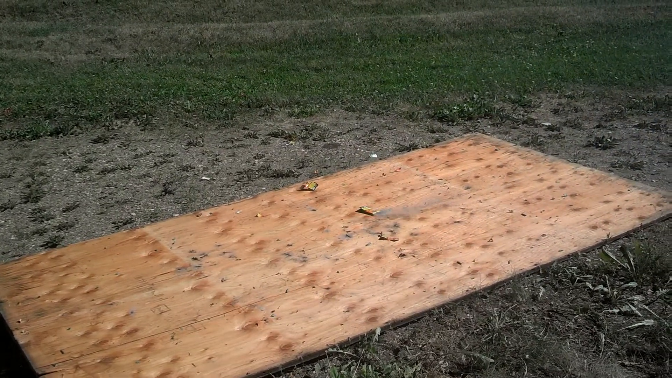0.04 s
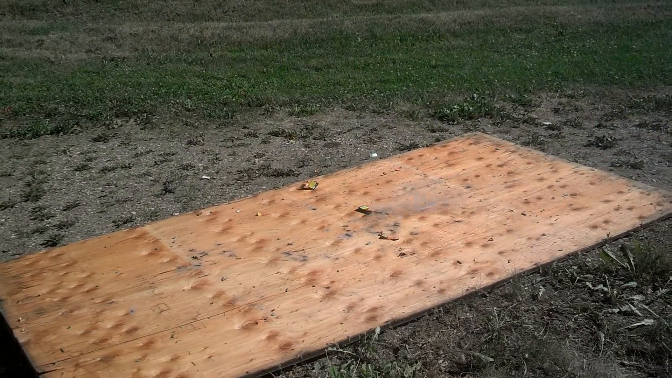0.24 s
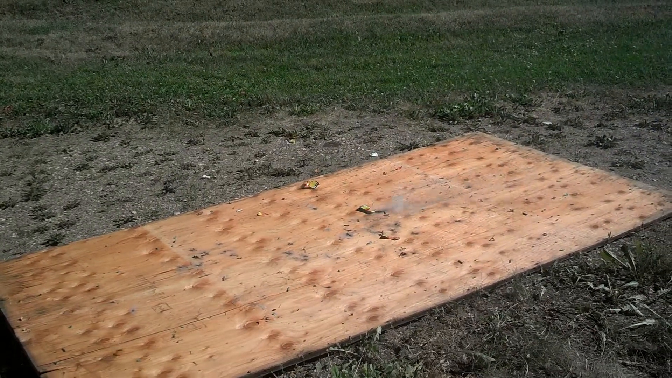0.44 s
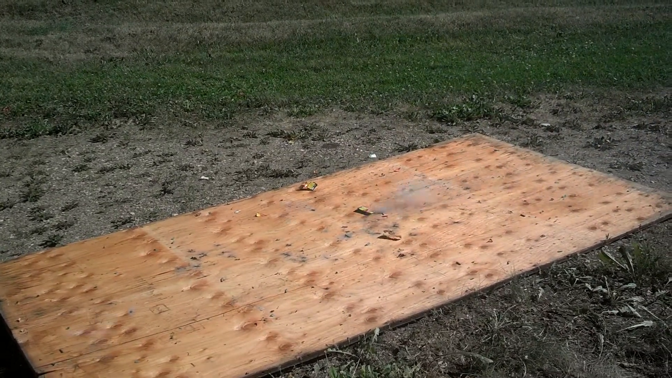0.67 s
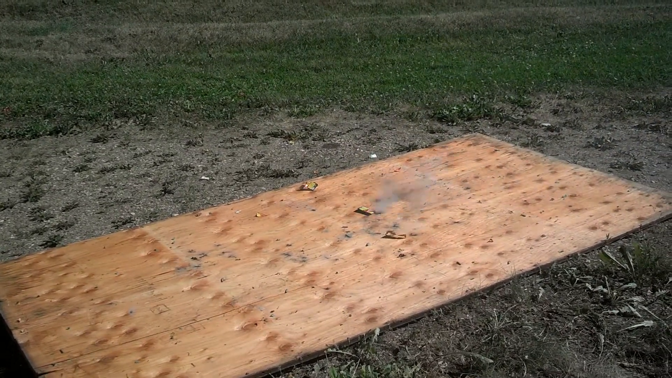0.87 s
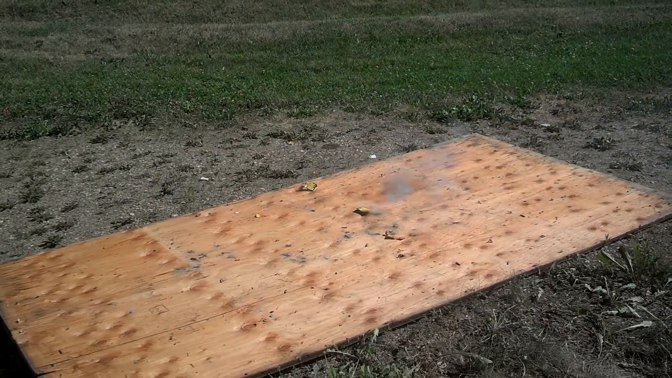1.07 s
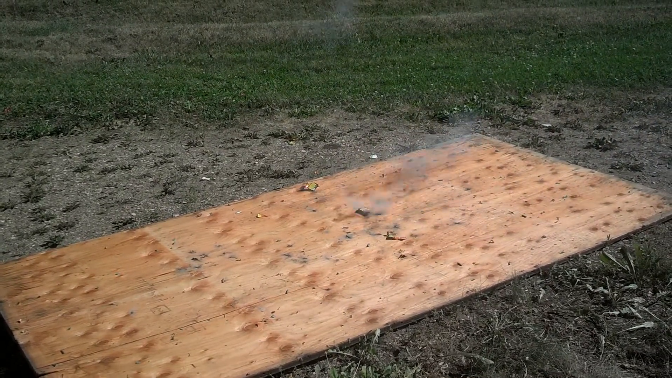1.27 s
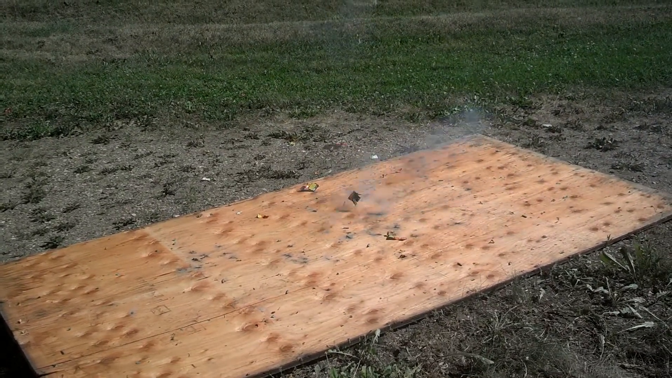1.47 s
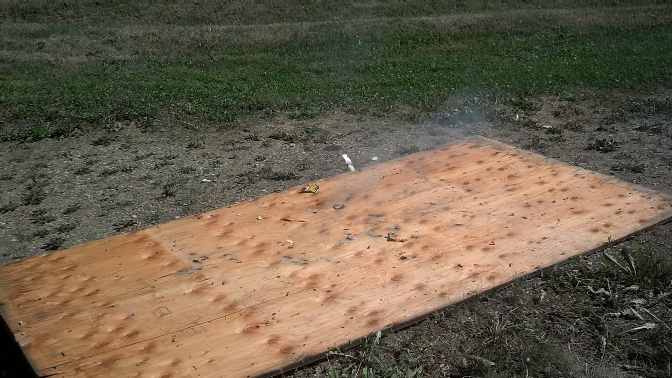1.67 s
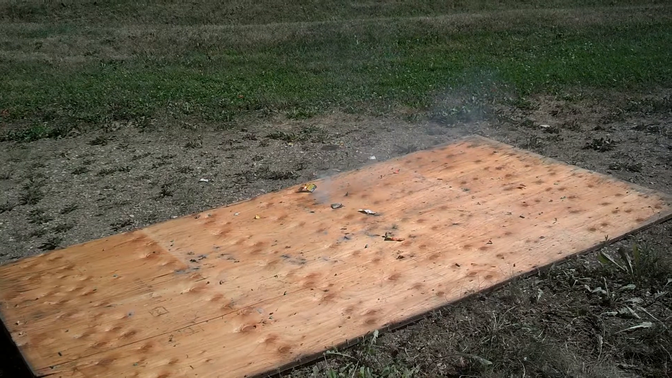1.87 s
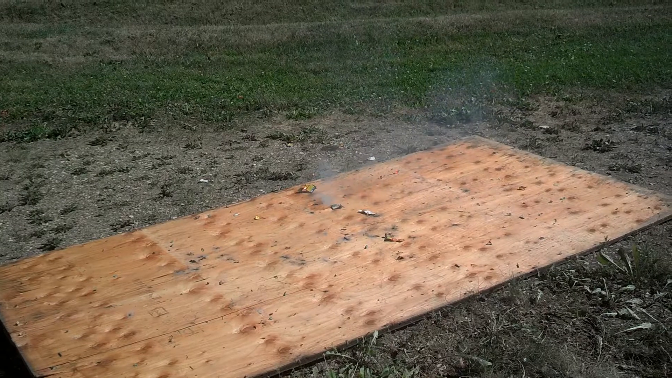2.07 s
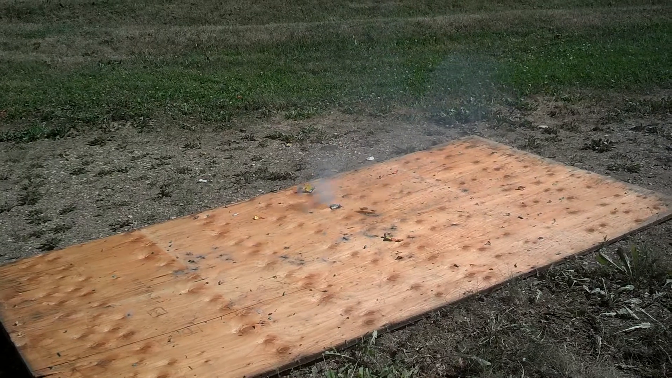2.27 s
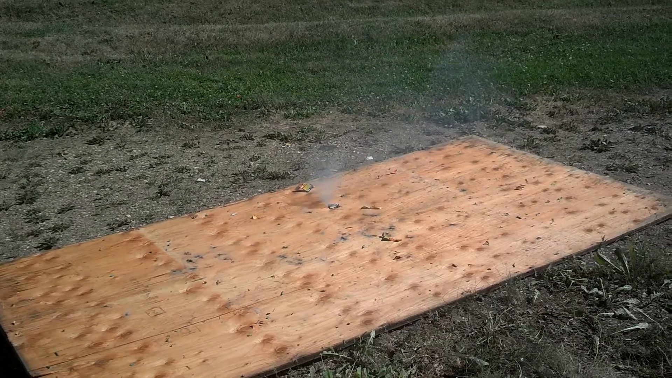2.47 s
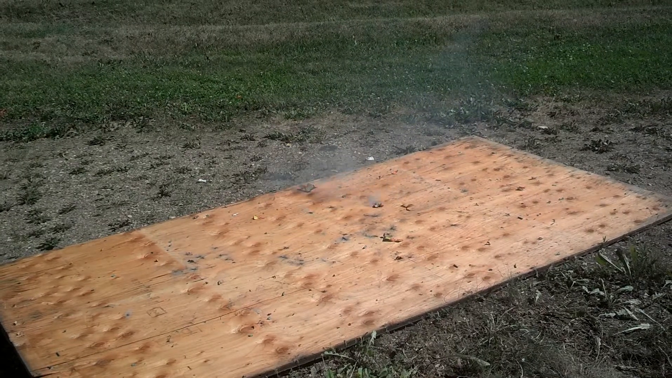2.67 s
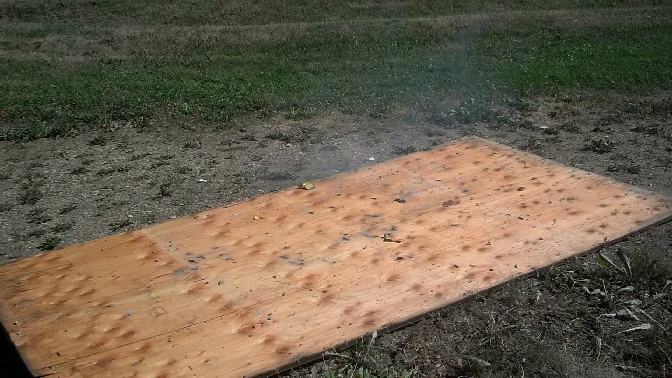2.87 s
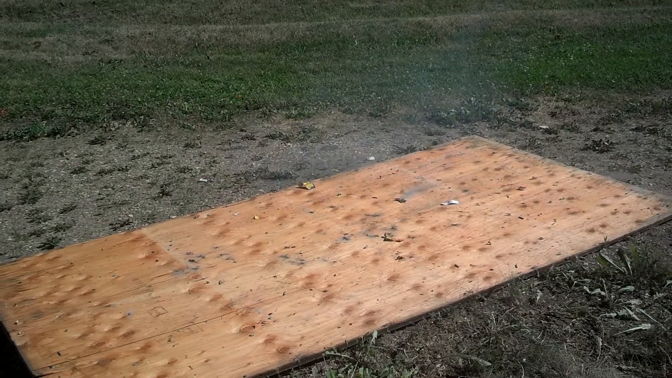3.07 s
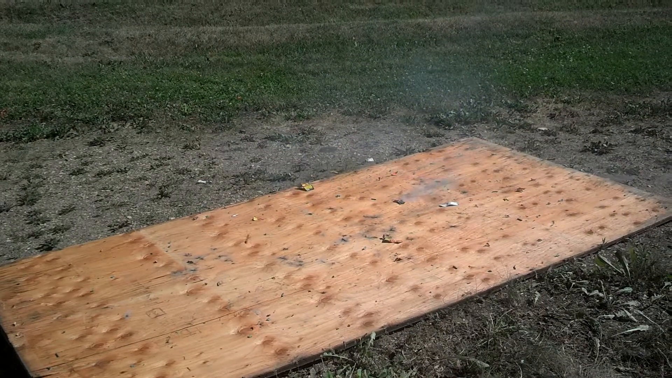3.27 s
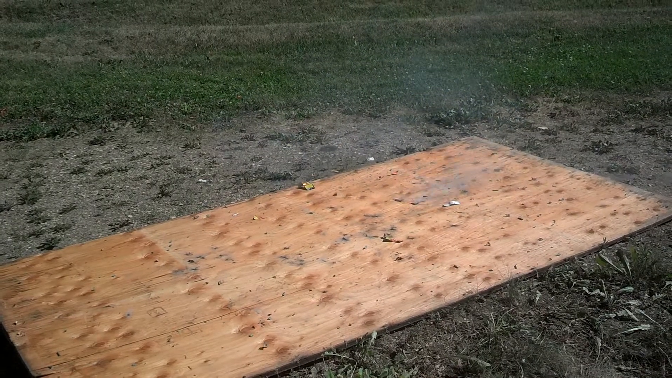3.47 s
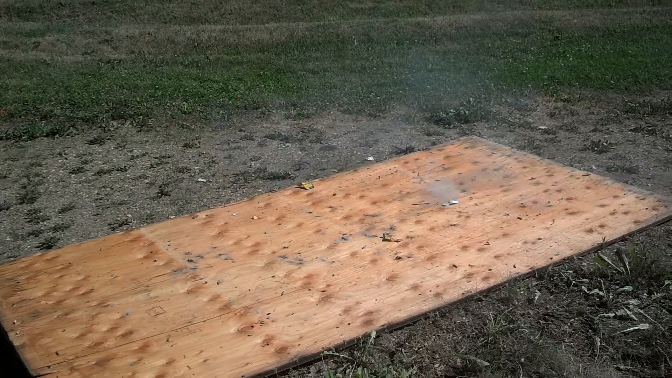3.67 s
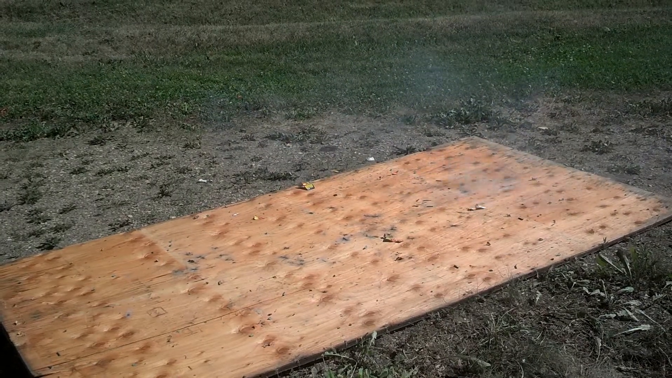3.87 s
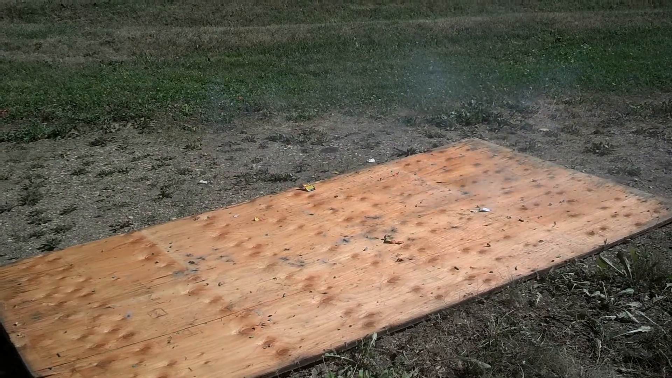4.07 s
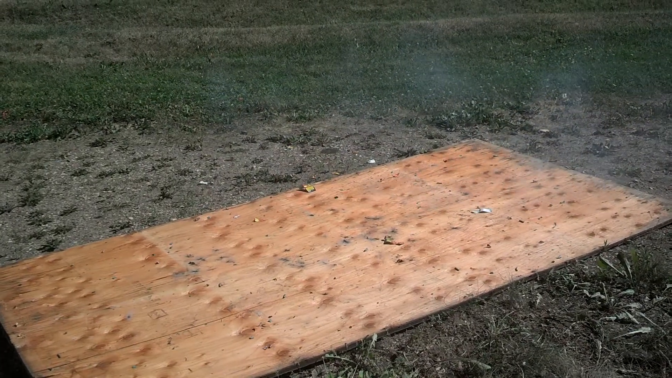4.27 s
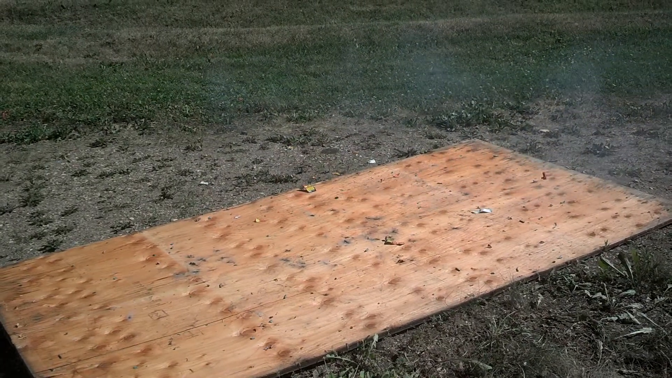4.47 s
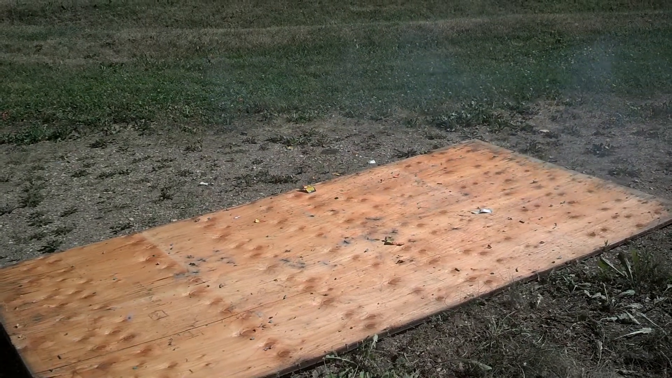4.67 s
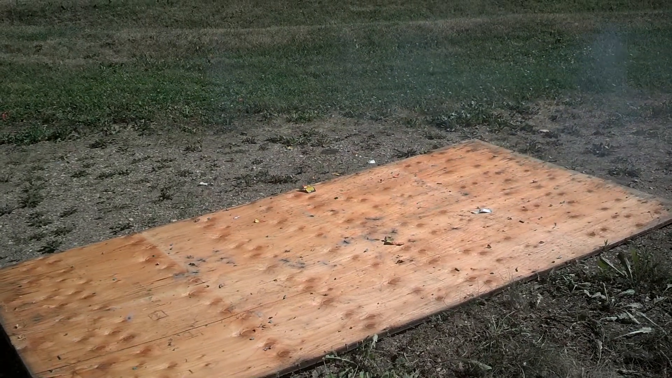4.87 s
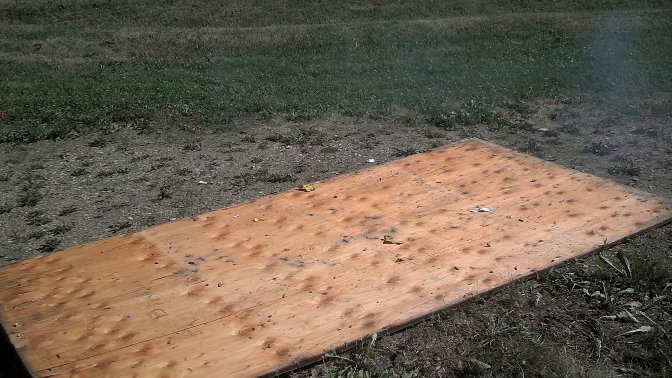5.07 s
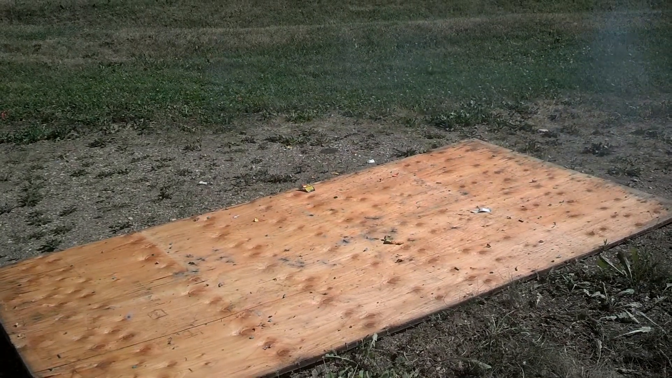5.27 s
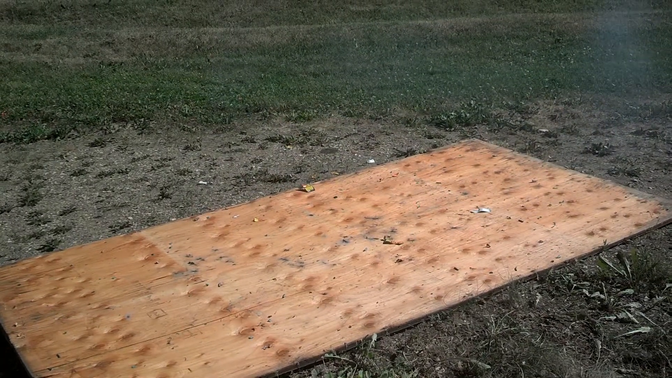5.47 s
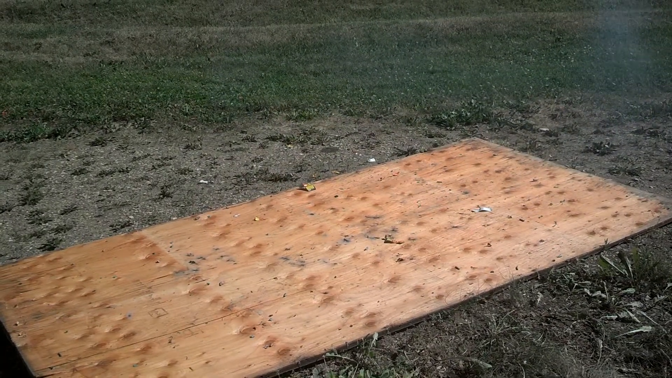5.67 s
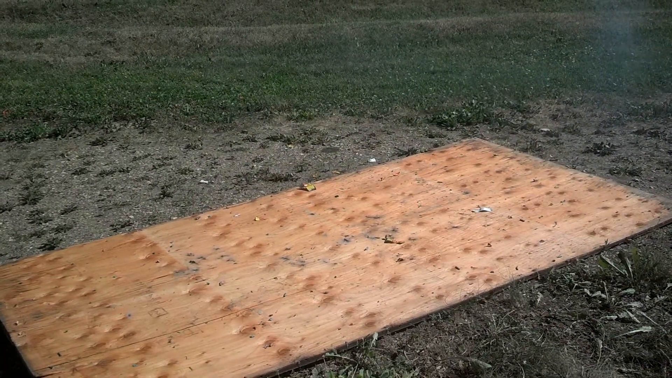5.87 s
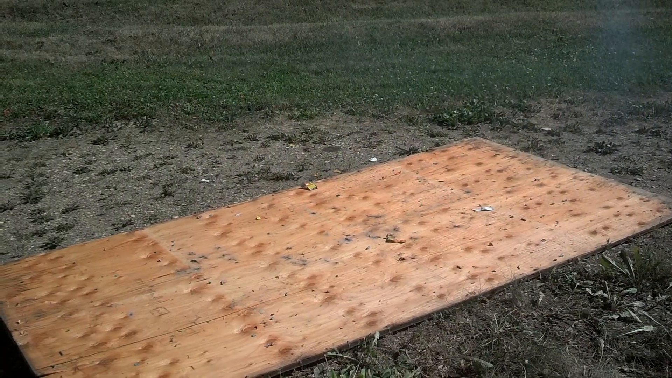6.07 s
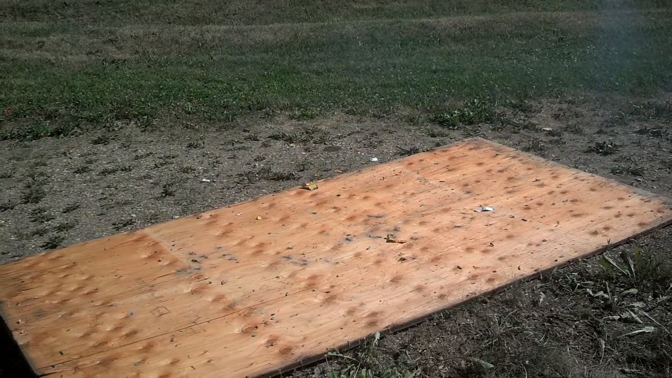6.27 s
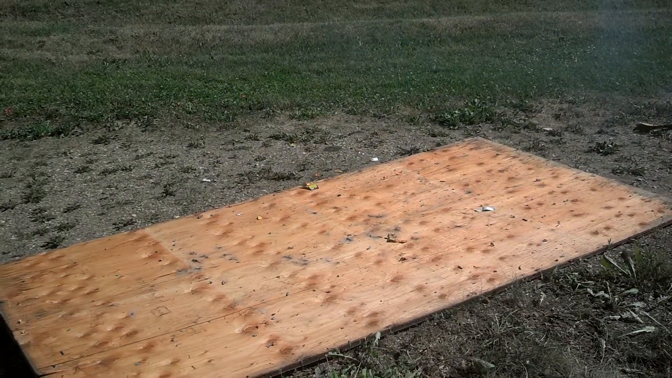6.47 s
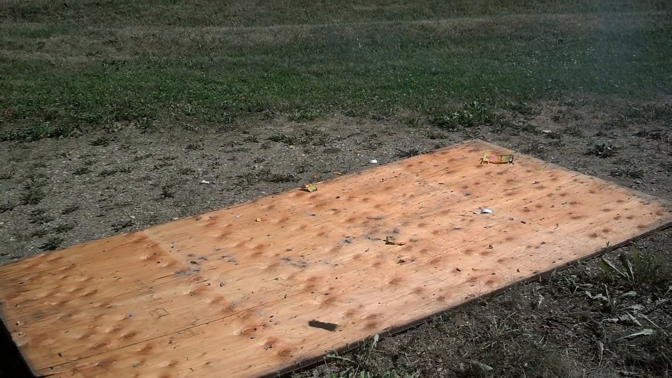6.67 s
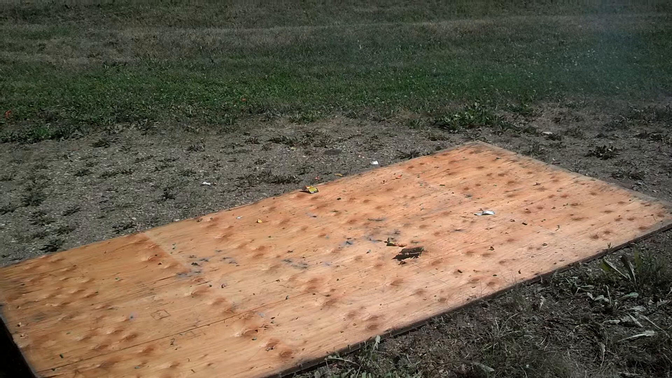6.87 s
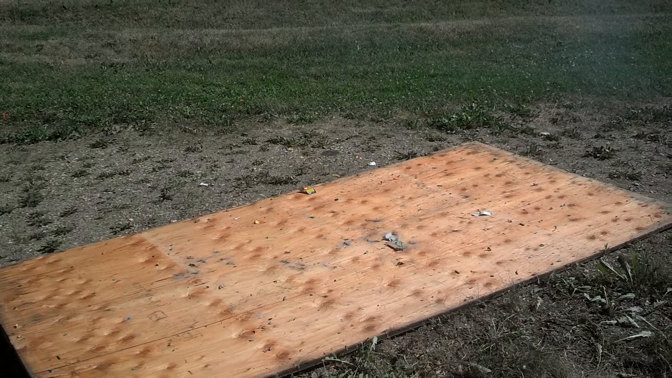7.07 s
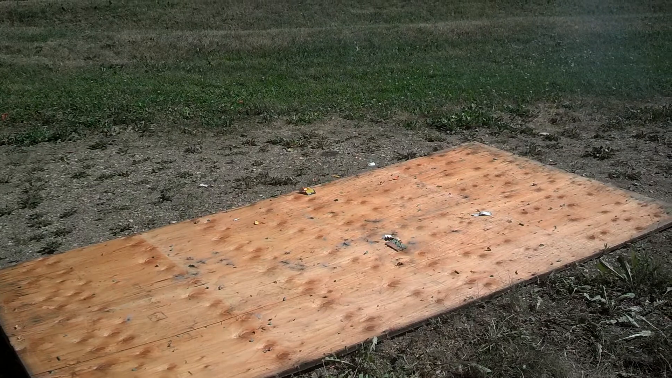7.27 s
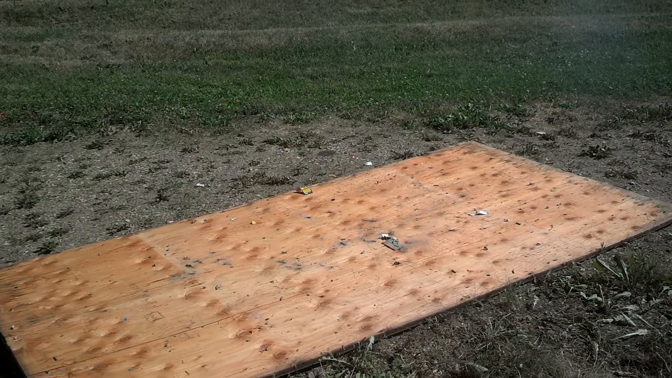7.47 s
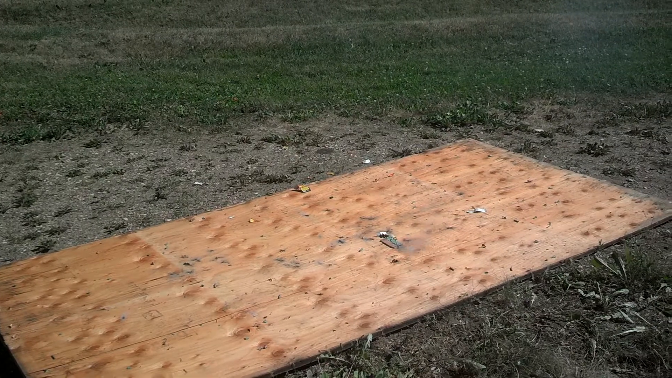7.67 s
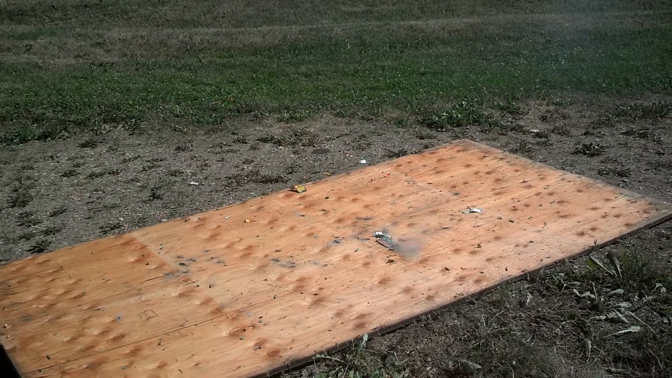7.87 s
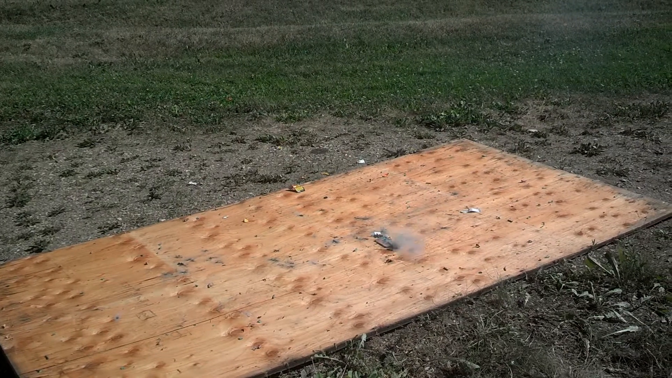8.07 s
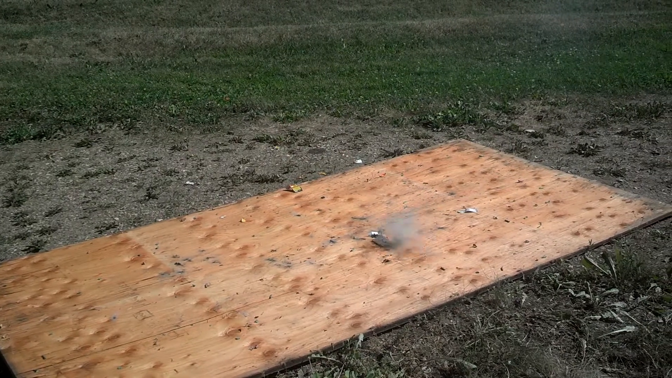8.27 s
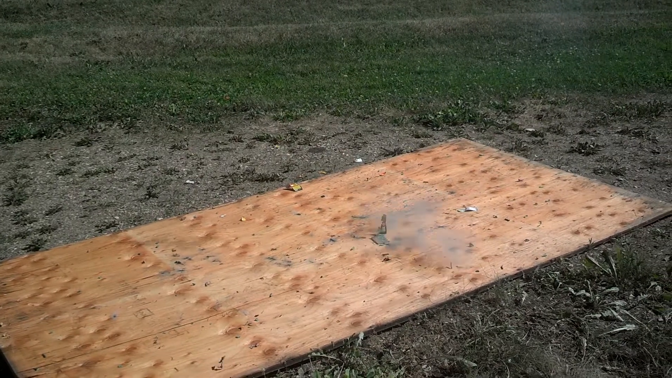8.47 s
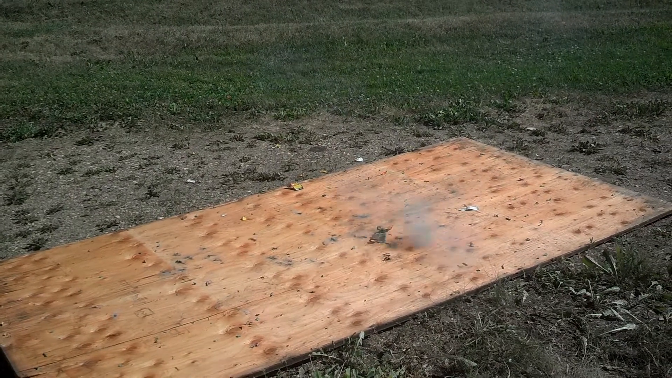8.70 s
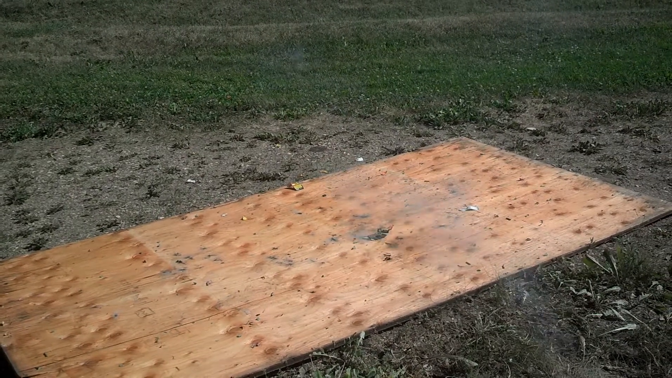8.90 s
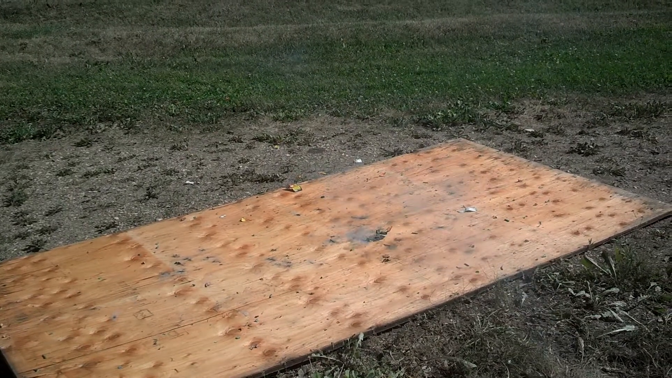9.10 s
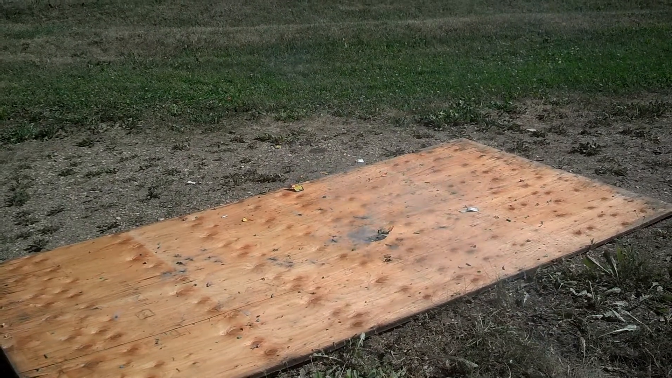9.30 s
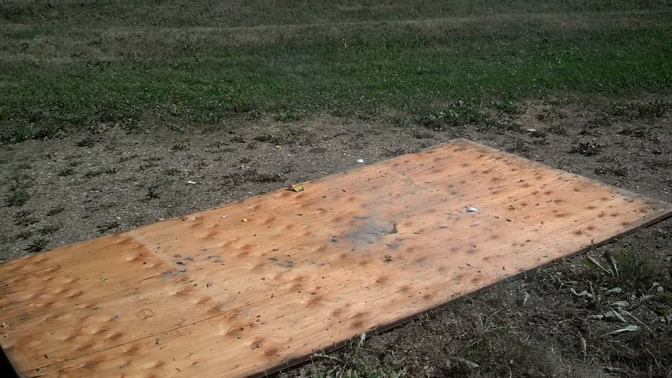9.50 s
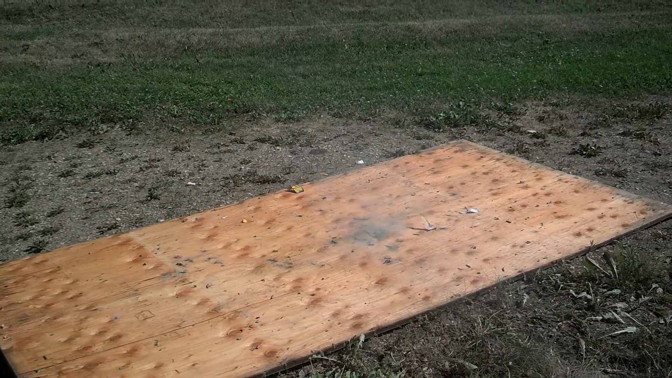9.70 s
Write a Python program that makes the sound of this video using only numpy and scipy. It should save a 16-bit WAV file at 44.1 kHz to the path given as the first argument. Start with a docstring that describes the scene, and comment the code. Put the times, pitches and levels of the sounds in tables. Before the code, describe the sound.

A faint fuse hiss in open air leads at 0.2 s into small firecrackers bursting on plywood. Sharp, dry bangs follow irregularly until 4.2 s, some single, others in tight doubles, varying from bright snaps to duller pops; especially hard hits fall near 3.4 and 3.9 s and may clip. Each has a quick slap from nearby walls and a grainy scattered tail. From 4.2 s the echo dies away and a low field hum gradually returns, with little fuse spits around 5.5 and 6.3 s. At 6.9 s a paper bundle lands with a soft slap. Low wind puffs thump and flutter, mainly on the right, strongest from 7.2 to 7.9 s, over a growing fuse hiss. At 8.3 s a second string cracks rapidly until 8.8 s, then pauses with ringing air and a faint scrap tick; two more bangs come at 9.4 and 9.6 s.

```python
"""Small firecrackers (steps plus gated noise) go off on a plywood sheet in a field; a few walls return the blasts.
Scattered noise bands die away over the ground; a field hum and a hissing fuse share those bands.
In the pause a new bundle drops on the sheet and wind puffs, as swelling sines, rock mainly one of two capsules.
Each channel is one capsule minus the delayed other one, which combs the sound; loud peaks clip."""
import sys
import numpy as np
from scipy import signal
from scipy.io import wavfile
from scipy.ndimage import uniform_filter1d

SR = 44100
rng = np.random.default_rng(int(sys.argv[2]) if len(sys.argv) > 2 else 0)


def digitize_waveform(pressure):
    """Quantize a signal to 16-bit integers and store it at the path in sys.argv[1].

    Rows of a 2-D input are taken as channels; values are limited to [-1, 1].
    """
    field = np.atleast_2d(pressure).T
    bounded = np.clip(field, -1, 1)
    quanta = np.round(bounded * 32767).astype(np.int16)
    wavfile.write(sys.argv[1], SR, quanta)


N = 429534
BURST_SAMPLES = 900


def from_db(db):
    """Decibels to amplitude gain; twice the dB gives power."""
    return 10 ** (np.asarray(db) / 20)


def rms_one(x):
    """Scales to rms 1 along the last axis."""
    return x / np.sqrt(np.mean(x ** 2, axis=-1, keepdims=True) + 1e-20)


def band(x, low_hz, high_hz):
    """Butterworth band-pass."""
    return signal.sosfilt(signal.butter(2, [low_hz, high_hz], "band", fs=SR, output="sos"), x)


def lumps(depth_db, low_hz, high_hz, length=N):
    """Random gain whose dB value wanders at low_hz to high_hz with rms depth_db."""
    return from_db(depth_db * rms_one(band(rng.standard_normal(length), low_hz, high_hz)))


def at_hz(points, hz, axis=1):
    """Reads a table column on a log-frequency axis."""
    points = np.array(points)
    return np.interp(np.log(hz), np.log(points[:, 0]), points[:, axis])


def add(out, x, start_s):
    """Mixes x into out from start_s."""
    i = round(start_s * SR)
    out[..., i:i + x.shape[-1]] += x[..., :N - i]


def pair(shared, own, alike):
    """Two capsule signals: the shared part in phase, the own part in opposite phase."""
    alike = np.clip(alike, -.98, .98)
    return np.sqrt((1 + alike) / 2) * shared + np.sqrt((1 - alike) / 2) * own * [[1], [-1]]


def dying(feed, t60_s):
    """Power envelope that falls 60 dB in t60_s after each feed."""
    return signal.lfilter([1], [1, -from_db(-120 / (t60_s * SR))], feed + 1e-18)


SINK_DB, RECOVER_DB_PER_S, QUIET_BEFORE_S = -21.5, 7.5, 1.4


def background_sink_db():
    """Background level offset: drops at every blast, rises steadily until it reaches 0 dB."""
    t = np.arange(N) / SR
    blast_s = np.r_[-QUIET_BEFORE_S, np.transpose(BANGS)[0]]
    since_s = t - blast_s[np.searchsorted(blast_s, t, side="right") - 1]
    return np.minimum(SINK_DB + RECOVER_DB_PER_S * since_s, 0)


# likeness of distant sound at the capsules: centre_hz, likeness (-1 to 1)
LIKENESS = [(100, 0.56), (400, 0.83), (1000, 0.067), (2500, 0.013)]


def noise_bands():
    """Half-octave bands of distant noise at both capsules, with their centres."""
    edges_hz = 45 * 2 ** np.arange(0, 8.6, .5)
    white = rng.standard_normal((2, 2, N))
    for k, (low_hz, high_hz) in enumerate(zip(edges_hz, edges_hz[1:])):
        centre_hz = np.sqrt(low_hz * high_hz)
        shared, own = band(white[k % 2], low_hz, high_hz)
        yield centre_hz, pair(shared, own, at_hz(LIKENESS, centre_hz))


# field hum spectrum: centre_hz, relative_db (density)
FIELD = [(50, -4), (100, 11), (160, 1.5), (250, 6.5), (400, -0.5), (700, -4.5), (1500, -14.5), (3000, -17),
         (6000, -24), (15000, -32)]


def field_power(hz, field_db):
    """Hum of the field: noise power coloured by its spectrum."""
    return from_db(2 * (field_db + at_hz(FIELD, hz) + 15.5))


# fuse burn before the background sinks: time_s, hiss_db (relative)
BURN = [(0, -51.5), (4.2, -53.5), (4.6, -85), (5.5, -80), (5.6, -66.5), (6.9, -74.5), (7.17, -64),
        (7.3, -55), (8.0, -52.5), (8.3, -48), (9.0, -66.5), (9.74, -38.5)]
# fuse flares: centre_s, boost_db (above the hiss)
FLARES = [(5.52, 15), (6.29, 9), (6.45, 11), (7.04, 9), (7.34, 4), (7.82, 10), (8.16, 2.5)]
FLARE_S = 0.045  # time from centre to 1/e of the boost


def fuse_level_db():
    """Fuse hiss level: interpolated burn plus a short Gaussian swell at each flare."""
    t = np.arange(N) / SR
    burn_s, burn_db = np.transpose(BURN)
    level_db = np.interp(t, burn_s, burn_db)
    for centre_s, boost_db in FLARES:
        level_db = level_db + boost_db * np.exp(-((t - centre_s) / FLARE_S) ** 2)
    return level_db


# fuse hiss spectrum: centre_hz, relative_db (density)
FUSE = [(600, -21), (1500, 2.5), (3400, -3.5), (5500, -5), (9500, -2), (12400, -12.5), (15500, 2)]


def fuse_power(hz, fuse_db, spit):
    """Fuse hiss: noise power above the lowest table frequency, made uneven by spit."""
    if hz <= FUSE[0][0]:
        return 0
    return (spit * from_db(fuse_db + at_hz(FUSE, hz) + 3.5)) ** 2


WAKE_DB, WAKE_T60_S, WAKE_SPREAD_S = -11, 0.33, 0.062
WIND_CUT_HZ, LEFT_WIND_DB = 890, -21


def to_capsules(wind):
    """Dulls the wind and puts it mainly on the right capsule."""
    dull = signal.sosfilt(signal.butter(2, WIND_CUT_HZ, fs=SR, output="sos"), wind)
    return dull * from_db([[LEFT_WIND_DB], [0]])


def wind_rumble(breeze_db):
    """Lumpy low noise: a breeze floor plus a wake that builds round each puff and dies away."""
    feed = np.zeros(N)
    for centre_s, level_db, _ in PUFFS:
        feed[round(centre_s * SR)] = from_db(2 * (level_db + WAKE_DB))
    wake_power = np.abs(uniform_filter1d(dying(feed, WAKE_T60_S), round(WAKE_SPREAD_S * SR)))
    envelope = np.sqrt(wake_power + from_db(2 * breeze_db))
    low_noise = rms_one(band(band(rng.standard_normal(N), 70, 190), 60, 280))
    return to_capsules(envelope * lumps(4, 10, 40) * low_noise)


def blast(thump_db, body_db, crack_db, body_hz, alike, length_ms):
    """A pressure step that swings back, and ragged noise while paper bursts; length_ms scales its decay."""
    t = np.arange(BURST_SAMPLES) / SR
    decay_s = 0.7 * length_ms / 1000
    ragged = lumps(3, 200, 1000, (2, len(t)))
    gate = np.minimum(t / .0007, 1) ** 2 * np.exp(-(t / decay_s) ** 0.99) * ragged
    noise = rng.standard_normal((6, len(t)))

    swing = np.sin(2 * np.pi * 330 * t / (1 + t / .008)) * np.exp(-t / .003)  # slows as it fades
    wobble = band(noise[0] * np.exp(-t / .004), 100, 480)
    thump = pair(rms_one(band(swing, 47, 730)), rms_one(wobble), alike)

    # lower body partly shared by the capsules, upper body independent
    low_body = band((1.5 * noise[1] + noise[2:4]) * gate, body_hz / 2.8, body_hz)
    high_body = band(noise[2:4] * gate, body_hz, body_hz * 2.26)
    body = rms_one(0.86 * low_body + high_body)

    low_crack = band(noise[4:] * gate, 2200, 6000)
    high_crack = band(noise[4:] * gate, 7500, 17000)
    crack = rms_one(low_crack + from_db(-7) * high_crack)

    bright = from_db(body_db) * body + from_db(crack_db) * crack
    direct = (from_db(thump_db) * thump + bright) / np.sqrt(2)
    return direct, bright


# firecracker blasts, plus two strong wall returns (at 0.621 s and 0.7971 s) played like blasts: start_s,
# thump_db, body_db, crack_db, body_hz, tail_db (levels relative)
BANGS = [(0.1998, -19, -16.5, -17.5, 1080, -37.5), (0.6046, -21, -21, -21, 1090, -40),
         (0.621, -41.5, -34, -31.5, 1060, -45), (0.7789, -19, -17, -23, 860, -38),
         (0.7971, -11.5, -19.5, -21.5, 720, -41), (1.0438, -21, -20, -20.5, 1440, -38),
         (1.1044, -19.5, -17.5, -20.5, 1310, -33.5), (1.152, -20, -20, -22, 1160, -34.5),
         (1.1724, -16, -22.5, -20.5, 1260, -39.5), (1.326, -17.5, -19.5, -21.5, 786, -39),
         (1.4498, -16, -16, -19, 1020, -38.5), (1.5455, -23, -21.5, -22.5, 1270, -40.5),
         (1.7273, -23, -8, -26.5, 647, -42), (1.8952, -21, -18.5, -26, 750, -43),
         (2.1532, -25, -15, -21, 755, -40), (2.2907, -24, -19, -21, 856, -35),
         (2.5821, -24.5, -16, -21, 844, -37), (2.609, -24.5, -19, -40, 1020, -44),
         (2.6925, -35, -28.5, -32, 890, -53.5), (2.7321, -19.5, -22, -23, 950, -39.5),
         (2.7416, -18.5, -22, -26, 960, -41.5), (3.077, -23.5, -16, -25, 650, -43.5),
         (3.1576, -30.5, -22.5, -28, 1050, -43), (3.322, -20, -18.5, -28, 745, -45.5),
         (3.428, -3, -17.5, -28.5, 734, -48), (3.554, -31, -23.5, -34.5, 1170, -56.5),
         (3.599, -14.5, -19, -22, 1130, -40.5), (3.6534, -10.5, -16.5, -31.5, 650, -39),
         (3.6655, -22, -14, -20.5, 970, -37.5), (3.922, -24, -20, -32, 720, -42.5),
         (3.9328, -9.5, -9, -15.5, 615, -43), (3.9496, -21.5, -23, -32, 656, -49.5),
         (4.0221, -19, -17, -23, 930, -37), (4.208, -21.5, -20.5, -24.5, 645, -40),
         (8.3156, -16, -11, -15, 1343, -44.5), (8.3774, -20, -17.5, -22, 820, -33),
         (8.3933, -23, -18.5, -24, 785, -42.5), (8.453, -14, -17, -29.5, 740, -45.5),
         (8.5139, -20.5, -18, -23.5, 1040, -36), (8.5427, -20, -15, -39.5, 606, -43.5),
         (8.7326, -16.5, -18.5, -20.5, 1140, -34.5), (8.7767, -14.5, -21, -19.5, 795, -45.5),
         (8.7831, -24, -19, -29.5, 900, -41), (9.4138, -14, -17, -25, 1220, -40.5),
         (9.582, -15.5, -20, -20.5, 1300, -43.5)]
THUMP_ALIKE, ALIKE_SPREAD = -.1, 0.66
BURST_SCALE_MS, BURST_DOUBLES_DB, USUAL_TAIL_DB = 4.4, 16, -22


def bangs():
    """Firecracker blasts with wall returns; more tail for its body means a longer burst."""
    out = np.zeros((2, N))
    sides = rng.standard_normal(len(BANGS))
    for (start_s, thump_db, body_db, crack_db, body_hz, tail_db), side in zip(BANGS, sides):
        excess_db = tail_db - body_db - USUAL_TAIL_DB
        length_ms = BURST_SCALE_MS * 2 ** (excess_db / BURST_DOUBLES_DB)
        alike = THUMP_ALIKE + ALIKE_SPREAD * side
        direct, bright = blast(thump_db, body_db, crack_db, body_hz, alike, length_ms)
        add(out, direct, start_s - .0006)
        add_wall_returns(out, bright, start_s, tail_db)
    return out


# wall returns: delay_s, relative_db (above the tail level)
ECHOES = [(.0140, -1), (.0175, -4), (.0300, -3.5), (.0380, -6), (.0665, -3)]


def add_wall_returns(out, bright, start_s, tail_db):
    """Walls return a shortened, band-limited burst at fixed delays with slightly random levels."""
    t = np.arange(BURST_SAMPLES) / SR
    snap = rms_one(band(bright * np.exp(-t / .002), 450, 12000))
    for delay_s, relative_db in ECHOES:
        add(out, from_db(tail_db + relative_db + rng.normal(0, 1.5)) * snap, start_s + delay_s)


def tail_feed(hz):
    """Power that each blast scatters near hz: a dull blast leaves a dull tail."""
    start_s, _, body_db, crack_db, _, tail_db = np.transpose(BANGS)
    tilt_db = 0.071 * (crack_db - body_db + 13.0) * np.log2(hz / 1500)
    feed = np.zeros(N)
    feed[np.round((start_s + .011) * SR).astype(int)] = from_db(2 * (tail_db + tilt_db))
    return uniform_filter1d(feed, size=300) * 300


# scattered returns: centre_hz, relative_db (density), near_t60_s, far_t60_s
TAIL = [(100, 2.5, 0.2, 0.18), (302, 4, 0.23, 0.81), (804, -5.5, 0.38, 1.3), (1450, -8.5, .5, 1.9),
        (2350, -10, 0.6, 2.1), (4400, -17.5, 0.64, 1), (9340, -22, 0.4, 1.3), (15800, -20.5, 0.19, 0.42)]
FAR_DB = -17


def scattered_power(hz, grain):
    """Scattered returns: clumpy near decay plus a smooth, weaker far decay."""
    feed = tail_feed(hz)
    patchy = lumps(2.1, 16, 60)  # each band has clumps of its own
    near = dying(feed, at_hz(TAIL, hz, axis=2)) * (grain * patchy) ** 2
    far = dying(feed, at_hz(TAIL, hz, axis=3)) * from_db(2 * FAR_DB)
    return (near + far) * from_db(2 * (at_hz(TAIL, hz) - 5))


def open_air(field_db, fuse_db):
    """Field hum, fuse hiss and scattered returns sum as power in one bank of noise bands."""
    spit = lumps(1.5, 8, 60)  # the fuse burns unevenly
    grain = lumps(2.6, 40, 250)  # returns arrive in clumps
    out = 0
    for hz, noise in noise_bands():
        power = scattered_power(hz, grain) + field_power(hz, field_db) + fuse_power(hz, fuse_db, spit)
        out = out + np.sqrt(power) * noise
    return out


# paper scraps and spits: start_s, level_db (relative)
TICKS = [(2.143, -33), (7.013, -39), (7.117, -36), (8.150, -35), (8.6935, -31), (9.0314, -37.5),
         (9.303, -39)]


def paper_ticks():
    """Small paper scraps and spits: band-passed noise with a very short decay."""
    out = np.zeros((2, N))
    t = np.arange(BURST_SAMPLES) / SR
    for start_s, level_db in TICKS:
        noise = rng.standard_normal((2, len(t))) * np.exp(-t / 0.0012)
        add(out, from_db(level_db) * band(noise, 600, 5000), start_s)
    return out


# wind puffs: centre_s, level_db (relative), nominal_hz (pitch glides round it)
PUFFS = [(5.006, -43, 208), (6.246, -35, 130.4), (6.416, -35, 126), (6.918, -28, 190), (6.942, -31, 154),
         (7.116, -27, 159), (7.15, -25, 109), (7.194, -30.5, 183), (7.232, -22.5, 303), (7.252, -16.5, 128),
         (7.31, -27, 127), (7.329, -20.5, 139), (7.392, -9, 164), (7.422, -18, 190), (7.458, -13, 226),
         (7.489, -13.5, 262), (7.57, -23.5, 149), (7.635, -20, 170), (7.725, -20.5, 146),
         (7.779, -19.5, 140), (7.809, -23, 167), (7.845, -15, 206), (8.003, -30, 133), (8.055, -29, 235),
         (8.077, -26, 156), (8.231, -35, 167)]
PUFF_SCALE_MS, PUFF_HALVES_DB, USUAL_PUFF_DB = 11.6, 10, -27.5


def wind_puffs():
    """Each puff rocks the membrane as a brief swelling sine; stronger puffs are shorter."""
    out = np.zeros(N)
    t = np.arange(-800, 1600) / SR
    for centre_s, level_db, nominal_hz in PUFFS:
        length_ms = PUFF_SCALE_MS * 2 ** ((USUAL_PUFF_DB - level_db) / PUFF_HALVES_DB)
        width_s = length_ms / 1000 * np.where(t < 0, .4, 1.1)  # fast rise, slower fall
        swell = np.exp(-np.abs(t / width_s) ** 1.4)
        glide_s = .55 * t + .004 * np.tanh((t + .002) / .004)  # quickest at the front
        phase = 2 * np.pi * (nominal_hz * glide_s + rng.random())
        rocking = np.sin(phase) + .2 * swell * np.sin(2 * phase)  # more harmonic at the peak
        add(out, np.sqrt(2) * from_db(level_db) * swell * rocking, centre_s + t[0])
    return to_capsules(out)


# bundle landing: start_s, thump_db, body_db, crack_db, body_hz, likeness, length_ms (decay scale)
DROP = [(6.8962, -49, -30.5, -29, 820, 0.72, 7.3)]


def bundle_drop():
    """A paper bundle lands on the sheet: a faint thump and noise burst shaped like a blast."""
    out = np.zeros((2, N))
    for start_s, *shape in DROP:
        direct, _ = blast(*shape)
        add(out, direct, start_s)
    return out


FIELD_DB, BREEZE_DB = -54, -57  # relative, before the background sinks


def scene():
    """Pressure at the two capsules."""
    sink_db = background_sink_db()
    air = open_air(FIELD_DB + sink_db, fuse_level_db() + sink_db)
    wind = wind_rumble(BREEZE_DB + sink_db) + wind_puffs()
    return air + wind + bangs() + paper_ticks() + bundle_drop()


OVERLOAD = .6  # saturation height
CAPSULE_LAG_SAMPLES, CUTOFF_HZ = 16, 16400


def record(dry):
    """Capsules saturate and lose deep bass; each subtracts the delayed other, clips and loses its top."""
    capsules = OVERLOAD * np.tanh(dry / OVERLOAD)
    capsules = signal.sosfilt(signal.butter(1, 35, "high", fs=SR, output="sos"), capsules)
    other = np.pad(capsules[::-1], ((0, 0), (CAPSULE_LAG_SAMPLES, 0)))[:, :N]
    aimed = np.clip(capsules - .985 * other, -.85, .85)
    top_cut = signal.cheby2(16, 60, CUTOFF_HZ, fs=SR, output="sos")
    return np.clip(signal.sosfilt(top_cut, aimed), -1, 1)


dry = scene()
out = record(dry)
digitize_waveform(out)
```